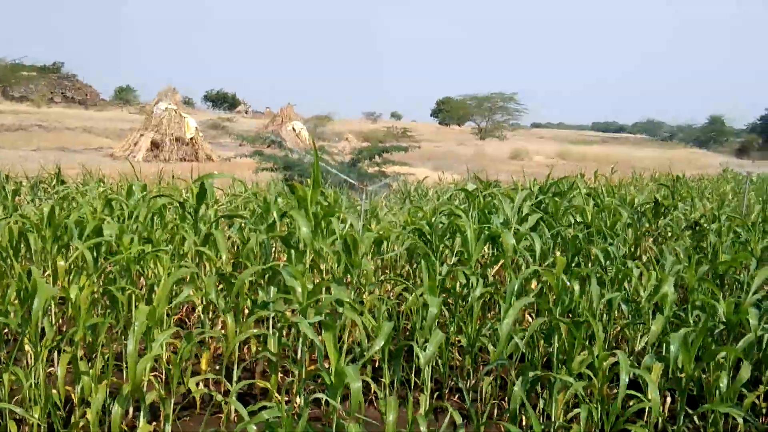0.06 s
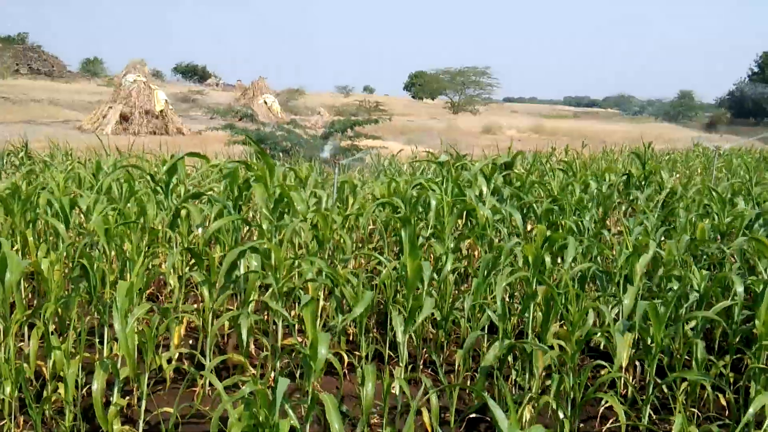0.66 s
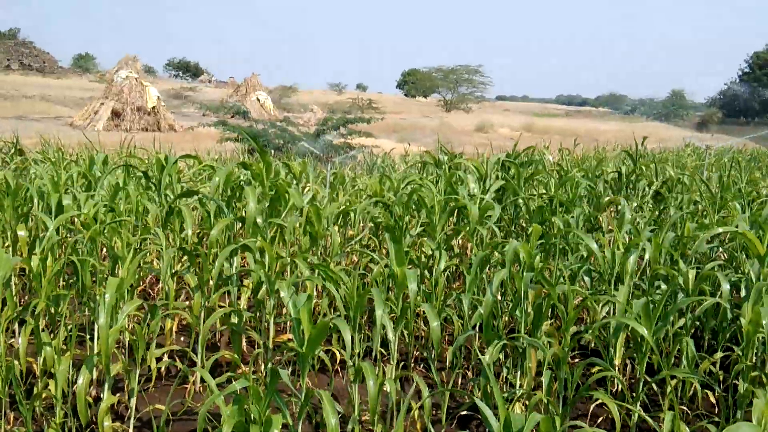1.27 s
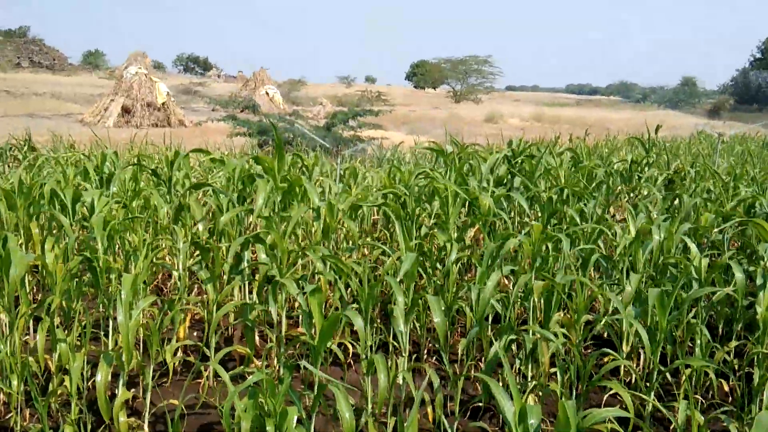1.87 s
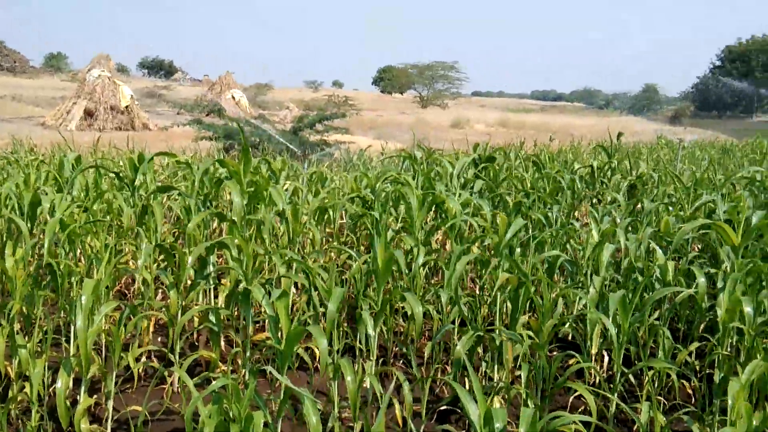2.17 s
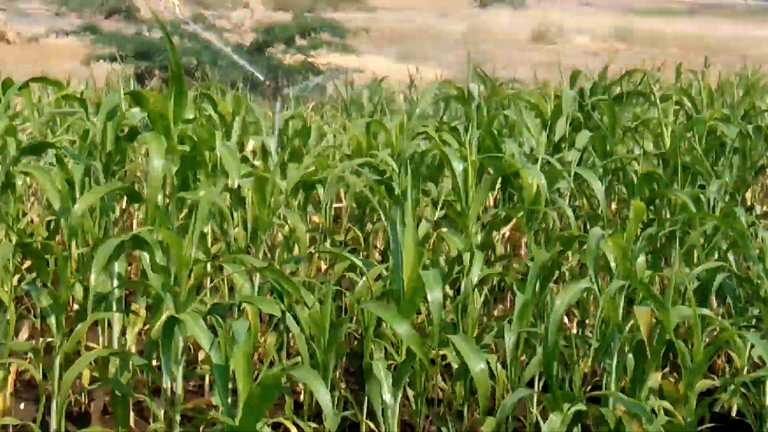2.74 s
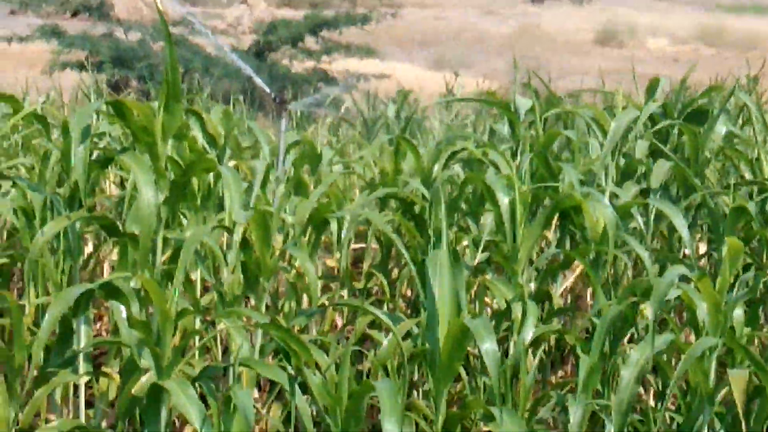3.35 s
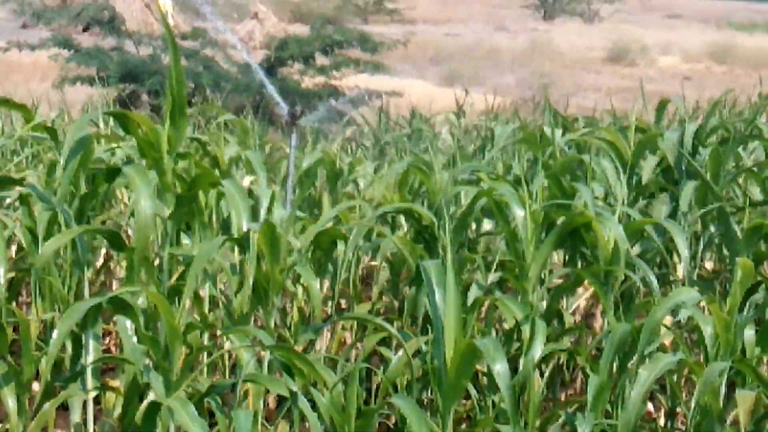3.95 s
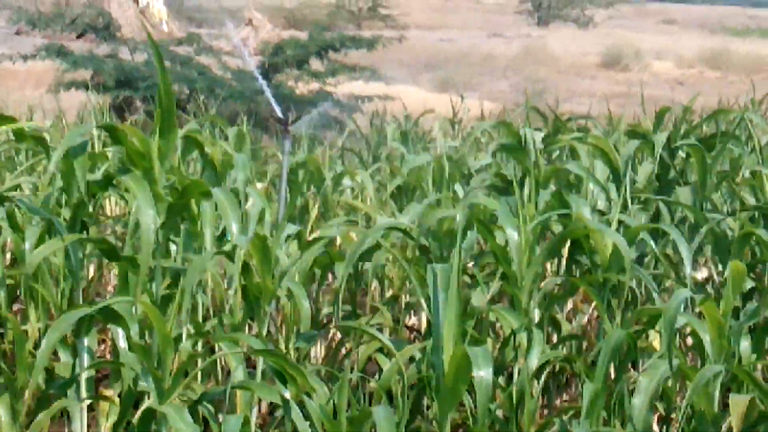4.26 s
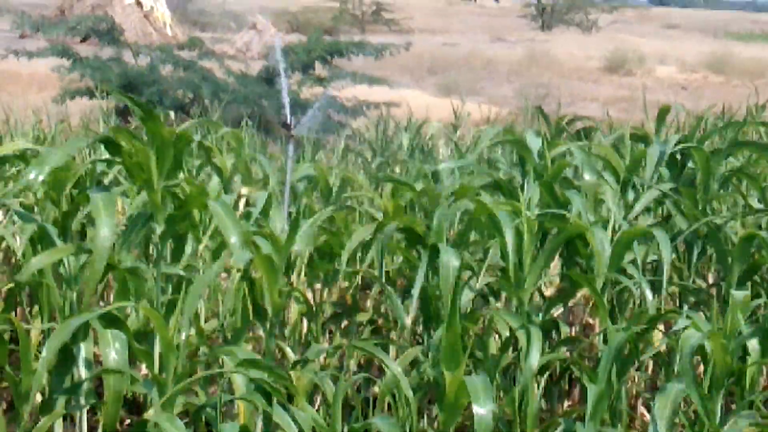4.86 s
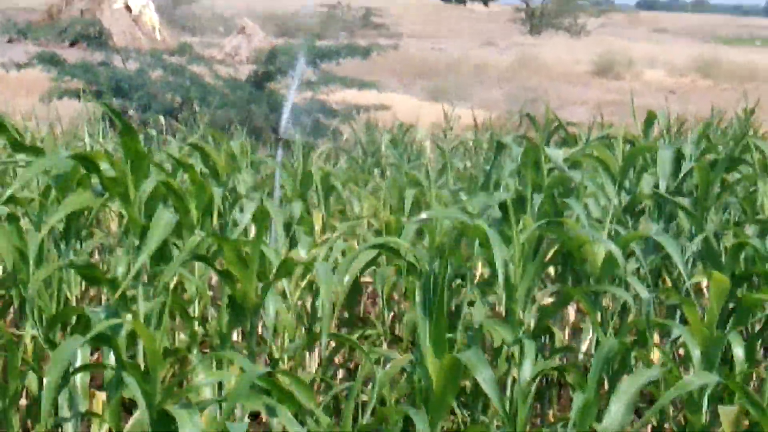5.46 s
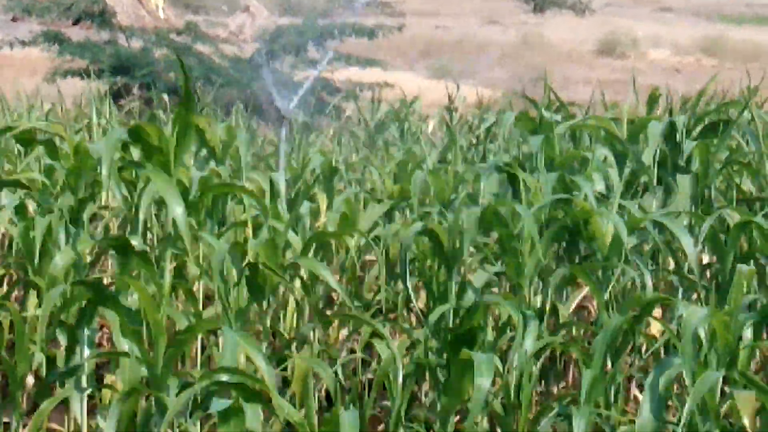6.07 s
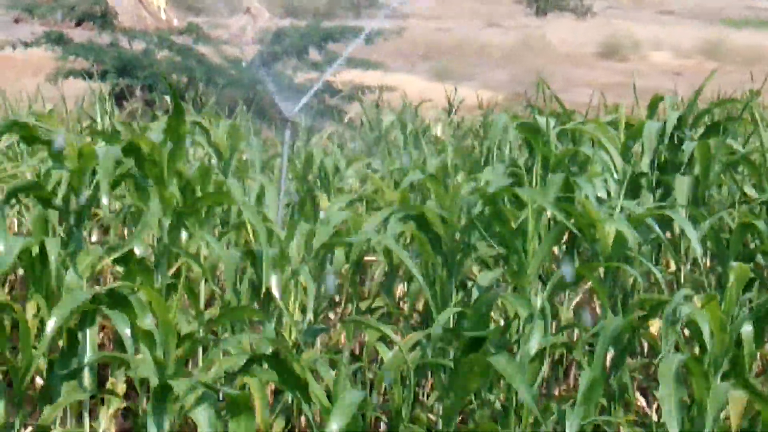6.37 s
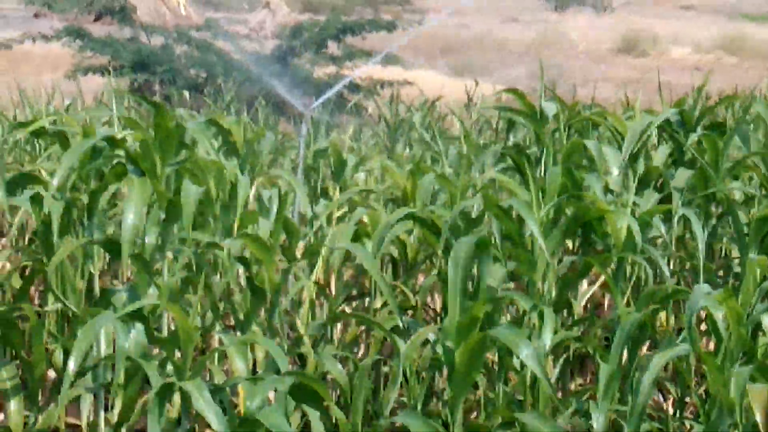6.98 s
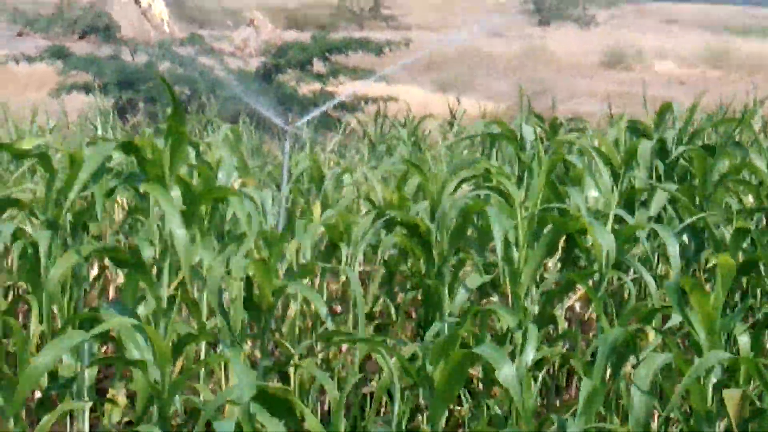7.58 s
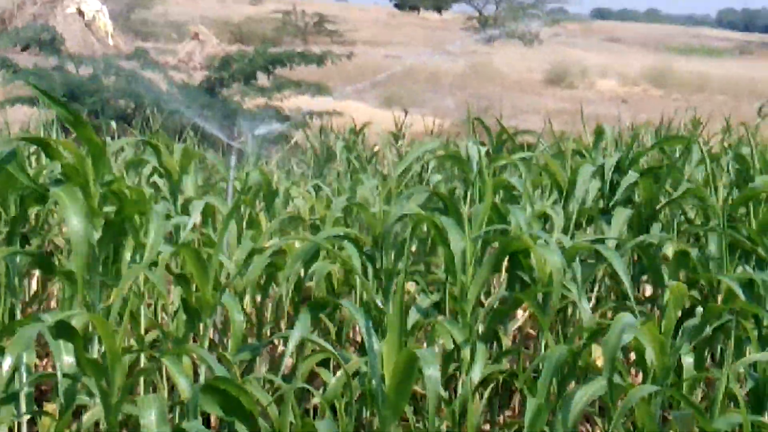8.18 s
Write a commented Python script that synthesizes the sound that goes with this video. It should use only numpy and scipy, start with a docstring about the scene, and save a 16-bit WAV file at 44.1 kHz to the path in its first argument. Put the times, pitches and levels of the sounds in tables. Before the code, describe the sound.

An impact sprinkler stands some way off in a field of tall crops, ticking and spitting spray about five times a second over a faint water hiss and soft leaf rustle. Gusty wind rumbles and thumps on the microphone, louder than the water. Just past the middle the wind drops and the whole sound dips briefly three times. Then the gusts return with their hardest thumps as the sprinkler carries on.

```python
"""Impact sprinkler in a breezy field

The sprinkler stands some way off in tall crop. Five times a second its arm slaps into the jet and
spits a fan of spray; between spits the jet hisses and drops patter on the rustling leaves. Close by,
blades scrape and a few small clicks sound. Puffs of wind carry vortices over the microphone, the
hardest as single thumps; in a lull the whole sound dips briefly three times."""
import sys
import numpy as np
from scipy import signal
from scipy.fft import rfft, irfft, next_fast_len
from scipy.io import wavfile
from scipy.ndimage import uniform_filter1d, minimum_filter1d

SR = 44100
rng = np.random.default_rng(int(sys.argv[2]) if len(sys.argv) > 2 else 0)


def to_wav(s):
    """Save 16-bit WAV."""
    ch = np.atleast_2d(s).T  # columns
    pcm = np.round(np.clip(ch, -1, 1) * 32767)  # PCM
    wavfile.write(sys.argv[1], SR, pcm.astype(np.int16))


N = 362943
TIME = np.arange(N) / SR
EDDY_HALF_S = 0.02


def undb(db):
    """Decibels to gain."""
    return 10 ** (np.asarray(db) / 20)


def unit(x):
    """Scale to rms 1."""
    return x / np.sqrt(np.mean(x ** 2))


def curve(table, column=1):
    """One column of a table, joined by straight lines in time."""
    rows = np.array(table)
    return np.interp(TIME, rows[:, 0], rows[:, column])


def add(out, start_s, sound):
    """Mix a sound in at a given time."""
    i = int(start_s * SR)
    part = sound[max(-i, 0):max(N - i, 0)]
    out[max(i, 0):max(i, 0) + len(part)] += part


def colour(x, spectrum):
    """Shape a signal by (frequency [Hz], gain [dB]) points; rms 1."""
    hz, db = np.transpose(spectrum)
    size = next_fast_len(N)
    bin_hz = np.maximum(np.fft.rfftfreq(size, 1 / SR), 1)
    gain = undb(np.interp(np.log(bin_hz), np.log(hz), db))
    return unit(irfft(rfft(x, size) * gain, size)[:N])


def walk(rate):
    """Random levels held 1 / rate s and smoothed twice; rms 1."""
    step = max(int(SR / rate), 2)
    held = np.repeat(rng.standard_normal(N // step + 1), step)
    return unit(uniform_filter1d(uniform_filter1d(held, step), step)[:N])


def impacts(rate, spread_db):
    """Random impulses, about `rate` a second; spread_db makes a few stand out; rms 1."""
    sizes = undb(spread_db * np.minimum(rng.exponential(size=N), 5))
    hits = rng.random(N) < rate / SR
    return unit(hits * sizes * rng.choice([-1, 1], N))


def flicker(x, rate, depth_db):
    """Let each half octave in the treble swell and fade on its own; rms 1."""
    size = next_fast_len(N)
    spectrum = rfft(x, size)
    bin_hz = np.maximum(np.fft.rfftfreq(size, 1 / SR), 1)
    half_octaves = np.clip(2 * np.log2(bin_hz / 3500), 0, 4)
    bands = (irfft(spectrum * np.maximum(1 - abs(half_octaves - k), 0), size)[:N] for k in range(5))
    return unit(sum(band * undb(depth_db * walk(rate)) for band in bands))


# level of the jet at the microphone; the background drops briefly just after the loudest wind thump: # (time
# [s], hiss level [dB], patter level [dB])
JET_LEVELS = [(0, -57.5, -79), (1.5, -64.5, -66.5), (2.6, -62.5, -76), (3.6, -61.5, -67),
              (5.05, -63, -70.5), (6.1, -60, -67), (6.7, -59, -66.5), (6.9, -63.5, -66), (7.4, -58, -67.5),
              (8.23, -59.5, -61)]
# tone of the jet: (frequency [Hz], gain [dB])
JET_SPECTRUM = [(1500, -18), (3200, -10), (4900, -4.5), (6100, -6.5), (7000, -5), (8800, 1), (10200, 6),
                (10900, -.5), (12400, -20), (16000, -31.5)]
# tone of a struck or scraped leaf: (frequency [Hz], gain [dB])
LEAF_SPECTRUM = [(2000, -29.5), (3800, -12.5), (5200, -3.5), (7000, 0), (10500, 1), (12700, -8.5),
                 (16000, -21)]


def jet():
    """Out in the crop the free jet hisses and its drops patter on the leaves."""
    flutter = undb(0.9 * walk(51))
    hiss = colour(rng.standard_normal(N) * flutter, JET_SPECTRUM)
    patter = colour(impacts(rate=300, spread_db=6.5), LEAF_SPECTRUM)
    hiss = flicker(hiss, rate=51, depth_db=1.4)
    return hiss * undb(curve(JET_LEVELS)) + patter * undb(curve(JET_LEVELS, column=2))


# level of the rustle; the background drops briefly just after the loudest wind thump: (time [s], level [dB])
RUSTLE_LEVELS = [(0, -55.5), (.3, -58.5), (3.6, -58), (4.4, -56.5), (4.95, -60), (5.17, -55), (5.6, -58.5),
                 (5.8, -54.5), (6.75, -54.5), (6.9, -58.5), (7.35, -54.5), (8.23, -55.5)]
# tone of the rustle: (frequency [Hz], gain [dB])
RUSTLE_SPECTRUM = [(60, -26), (300, -4), (600, 0), (1100, 2), (1600, 1), (2000, 3.5), (2250, 0),
                   (2550, 0.5), (2950, -4.5), (4500, -5.5), (9000, -15)]


def field_rustle(flutter_db=0.82):
    """Leaves rustle softly all over the field."""
    rustle = rng.standard_normal(N) + undb(-6) * impacts(rate=500, spread_db=5)
    return colour(rustle, RUSTLE_SPECTRUM) * undb(curve(RUSTLE_LEVELS) + flutter_db * walk(30))


# the breeze at the microphone, with a lull in the middle: (time [s], level [dB])
BREEZE_LEVELS = [(0, -27.5), (.24, -43.5), (.56, -40), (.8, -35), (1.35, -27), (1.7, -33), (2.3, -38.5),
                 (2.75, -37.5), (3.05, -28.5), (3.64, -39.5), (4.42, -46), (4.56, -67), (5.62, -54.5),
                 (5.76, -30.5), (6.05, -38.5), (6.75, -29), (7.3, -34.5), (8.23, -43)]
# puffs at the microphone: (middle time [s], length [s], level [dB], vortex centre [Hz])
WIND_PUFFS = [(0.103, 0.042, -25, 105), (0.182, 0.016, -22, 116), (0.334, 0.072, -32, 102),
              (0.789, 0.099, -30.5, 95), (0.95, 0.046, -32, 98), (1.06, 0.028, -30, 98),
              (1.2, 0.067, -24.5, 135), (1.338, 0.067, -15, 137), (1.59, 0.16, -36, 136),
              (1.878, 0.043, -20, 100), (1.985, 0.12, -26.5, 158), (2.288, 0.098, -23, 125),
              (2.41, 0.098, -27.5, 145), (2.58, 0.089, -25, 104), (2.761, .04, -32, 137),
              (2.963, 0.13, -23, 119), (3.25, 0.039, -25, 162), (3.373, .08, -28, 146),
              (3.501, 0.058, -27.5, 146), (3.73, 0.058, -30, 108), (3.839, 0.023, -28, 131),
              (3.93, 0.018, -17.5, 133), (4.049, 0.069, -27, 139), (4.177, 0.071, -28, 127),
              (4.299, 0.011, -27.5, 107), (4.436, 0.062, -31, 107), (4.989, 0.021, -38, 87),
              (5.137, 0.032, -38.5, 86), (5.207, 0.014, -35.5, 99), (5.314, 0.056, -43, 87),
              (5.703, 0.02, -21, 152), (5.826, 0.036, -23.5, 154), (5.896, 0.076, -28, 120),
              (6.118, 0.067, -27, 152), (6.269, 0.064, -26, 173), (6.376, 0.043, -20.5, 209),
              (6.457, 0.033, -23.5, 223), (6.583, 0.046, -20, 245), (6.647, 0.075, -21.5, 186),
              (6.773, 0.05, -20.5, 219), (6.819, 0.025, -11.5, 150), (6.941, 0.048, -19, 125),
              (7.035, 0.027, -23.5, 140), (7.133, 0.13, -23.5, 176), (7.346, .05, -29.5, 149),
              (7.625, 0.023, -22.5, 142), (7.777, 0.41, -35.5, 139), (7.888, 0.068, -28, 141),
              (8.139, .04, -27.5, 124), (8.22, 0.022, -29, 127)]


def airflow(turbulence_db=3.5, eddy_hz=114.1, reference_db=-28.5, doubling_db=51):
    """Strength of the wind and centre frequency of its vortices: a turbulent breeze plus puffs."""
    breeze_db = curve(BREEZE_LEVELS)
    power = undb(breeze_db + turbulence_db * walk(30)) ** 2
    # a faster breeze sheds quicker vortices
    weighted_hz = power * eddy_hz * 2 ** ((breeze_db - reference_db) / doubling_db)
    t = np.arange(-(SR // 4), SR // 4) / SR
    for middle, length, db, hz in WIND_PUFFS:
        puff = undb(db) ** 2 * np.exp(-2 * (2 * t / length) ** 2)
        add(power, middle + t[0], puff)
        add(weighted_hz, middle + t[0], puff * hz)
    return np.sqrt(power), weighted_hz / power


def eddy(hz, phase_turns):
    """Pressure swing of one vortex crossing the microphone port; small ones are quick and bright."""
    half = int(EDDY_HALF_S * SR)
    t = np.arange(-half, half) / SR
    swing = 1 / (1 - 2j * np.pi * hz * t / 2.5)
    return np.real(np.exp(2j * np.pi * phase_turns) * swing ** 3)


def microphone_port(x, cut_hz=62, ring_hz=115, width_hz=24, ring_db=-7):
    """The microphone passes no deep bass and booms a little at one low pitch."""
    x = signal.sosfilt(signal.butter(4, cut_hz, "high", fs=SR, output="sos"), x)
    boom = signal.lfilter(*signal.iirpeak(ring_hz, ring_hz / width_hz, fs=SR), x)
    return x + undb(ring_db) * boom


def wind_rumble(count=2000, pitch_scatter=0.23, spread_db=5, gain_db=0.21):
    """Vortices rumble right on the microphone, as strong and as quick as the air that carries them."""
    strength, centre_hz = airflow()
    stream = np.zeros(N)
    timings, shapes = rng.random((count, 2)), rng.standard_normal((count, 2))
    for k, ((slot, phase), (size, speed)) in enumerate(zip(timings, shapes)):
        i = int((k + slot) / count * (N - 1))
        hz = 0.97 * centre_hz[i] * np.exp(pitch_scatter * speed)
        add(stream, i / SR - EDDY_HALF_S, undb(spread_db * size) * eddy(hz, phase))
    # even out the stream so that the airflow alone sets its strength
    stream /= np.sqrt(uniform_filter1d(uniform_filter1d(stream ** 2, SR // 40), SR // 80))
    fade_in = np.minimum(TIME / EDDY_HALF_S, 1)
    return microphone_port(stream * strength * undb(gain_db) * fade_in)


# strokes of the arm, some way off: (time [s], length [s], spray level [dB], slap level [dB])
ARM_STROKES = [(0.035, 0.043, -48.5, -37), (0.239, 0.025, -48.5, -47), (0.43, .037, -47.5, -36),
               (0.626, .035, -48.5, -39.5), (0.819, 0.08, -50.5, -41), (0.999, 0.049, -49.5, -58),
               (1.205, 0.036, -49.5, -38), (1.399, .044, -48.5, -41), (1.592, .041, -47, -46),
               (1.781, 0.039, -46, -38.5), (1.976, 0.038, -46.5, -42), (2.172, 0.041, -49.5, -39),
               (2.361, 0.044, -49, -44), (2.545, 0.049, -45.5, -47), (2.754, 0.042, -45, -38),
               (2.95, 0.029, -44, -37), (3.143, 0.038, -46, -33), (3.339, 0.04, -48.5, -40),
               (3.532, .04, -49, -49), (3.732, 0.046, -47, -42), (3.937, .04, -47.5, -49.5),
               (4.118, 0.076, -50.5, -52), (4.329, 0.04, -47, -45), (4.527, 0.035, -50.5, -36),
               (4.73, 0.037, -52.5, -40), (4.946, 0.031, -52, -56), (5.134, 0.033, -48, -56),
               (5.335, .043, -51.5, -43), (5.543, 0.04, -48, -48), (5.741, .043, -48.5, -49),
               (5.948, 0.047, -49, -42), (6.159, 0.044, -51, -51), (6.365, 0.029, -47.5, -42),
               (6.555, 0.071, -49, -66), (6.77, 0.032, -47, -49), (6.972, 0.044, -48, -53),
               (7.148, 0.071, -50, -63), (7.367, .044, -47.5, -49.5), (7.576, 0.041, -43, -41),
               (7.777, 0.032, -45.5, -56), (7.98, 0.024, -47, -50), (8.171, 0.033, -43.5, -41)]
# tone of the spray: (frequency [Hz], gain [dB])
SPRAY_SPECTRUM = [(1000, -38.5), (2800, -21.5), (4300, -9), (5100, -5), (5450, -12), (6500, -6.5),
                  (8300, -6), (8800, -9), (9900, -0.5), (10900, 1), (11850, -7), (12700, -13), (14300, -15),
                  (16000, -21)]
# tone of the arm striking the jet: (frequency [Hz], gain [dB])
SLAP_SPECTRUM = [(1500, -7), (3000, -14.5), (4500, 3.5), (5500, -3), (8000, -7.5), (9000, -26),
                 (10800, 11.5), (12000, -7), (12700, -22), (16000, 0)]


def sprinkler(rise_s=0.0062, fall_s=0.0096, slap_s=0.0016, slap_lag_s=0.0028,
              trail_s=0.067, trail_lag_s=0.08):
    """The arm slaps into the jet, shreds it harder as it goes deeper, swings out; thin spray trails."""
    spray_power, slaps = np.zeros(N), np.zeros(N)
    t = np.arange(-(SR // 50), SR // 5) / SR
    for start, length, spray_db, slap_db in ARM_STROKES:
        in_jet = np.exp(np.minimum(t, 0) / rise_s - np.maximum(t - length, 0) / fall_s)
        swell_db = np.minimum(t / length, 1)
        fan = in_jet * undb(spray_db - 1.4 + swell_db)
        trail_db = spray_db - 13 + 2 * rng.standard_normal()
        trail = undb(trail_db) * np.exp(-0.5 * ((t - length - trail_lag_s) / trail_s) ** 2)
        add(spray_power, start + t[0], fan ** 2 + trail ** 2)
        add(slaps, start + t[0], undb(slap_db - 1) * np.exp(-abs(t - slap_lag_s) / slap_s))
    # the sheet of water tears into droplets, so the hiss sputters and no two spits have the same colour
    water = rng.standard_normal(N) + undb(2.5) * impacts(rate=2800, spread_db=0)
    water = flicker(colour(water, SPRAY_SPECTRUM), rate=80, depth_db=2.5)
    sputter = unit(undb(2.55 * walk(450)))
    spray = np.sqrt(spray_power) * water * sputter
    return spray + slaps * colour(rng.standard_normal(N), SLAP_SPECTRUM)


# the hardest vortices, right on the microphone: (time [s], level [dB], centre [Hz])
HARD_VORTICES = [(0.096, -24.5, 187), (1.341, -11, 322), (1.94, -15.5, 160), (1.982, -14.5, 296),
                 (2.022, -14, 242), (2.08, -13.5, 231), (2.273, -18, 161), (3.243, -23, 267),
                 (3.335, -17.5, 210), (3.514, -20, 250), (3.927, -29, 200), (4.222, -18, 175),
                 (5.699, -12, 248), (6.206, -10, 346), (6.259, -11, 338), (6.375, -9.5, 312),
                 (6.44, -25, 477), (6.459, -16.5, 260), (6.495, -16, 308), (6.561, -13, 276),
                 (6.577, -7.5, 310), (6.587, -8, 282), (6.64, -10.5, 300), (6.653, -8, 225),
                 (6.71, -10.5, 312), (6.772, -4, 233), (6.821, -5.5, 302), (6.858, -14, 228),
                 (6.952, -17, 370), (7.106, -13, 230), (7.144, -17, 300), (7.425, -17.5, 274),
                 (7.512, -8, 218)]


def wind_buffets(wake_db=-13, wake_lag_s=0.00491, wake_spread_s=0.0087):
    """Single hard vortices thump on the port, each breaking into four weaker ones around and after it."""
    out = np.zeros(N)
    for time, db, hz in HARD_VORTICES:
        start = time - EDDY_HALF_S
        add(out, start, undb(db + 1) * eddy(hz, rng.random()))
        for lag, speed in rng.standard_normal((4, 2)):
            wake = eddy(0.82 * hz * np.exp(0.31 * speed), rng.random())
            add(out, start + wake_lag_s + wake_spread_s * lag, undb(db + wake_db) * wake)
    return microphone_port(out)


# leaves near the microphone, scraping in the gusts: (time [s], length [s], level [dB])
LEAF_STROKES = [(0.108, .08, -55), (1.097, 0.063, -54.5), (1.33, 0.066, -54), (1.822, 0.051, -52),
                (2.061, 0.015, -47.5), (2.078, 0.033, -52), (2.297, 0.062, -50), (6.671, 0.039, -50.5)]


def leaf_scrapes():
    """Rough blades close by catch and slip on each other in short crackling strokes."""
    strokes = np.zeros(N)
    for start, length, db in LEAF_STROKES:
        add(strokes, start, undb(db) * signal.windows.tukey(int(length * SR)))
    slips = impacts(rate=9300, spread_db=5) * undb(1.5 * walk(330))
    return strokes * colour(slips, LEAF_SPECTRUM)


# small clicks close to the microphone: (time [s], level [dB], band frequency [Hz], decay [s])
CLOSE_CLICKS = [(0.436, -48, 7500, 0.0034), (2.466, -49.5, 1700, 0.01), (6.623, -39, 3000, 0.00084),
                (6.631, -27, 1420, 0.0014), (6.68, -41, 8200, 0.0021), (6.713, -45, 4500, .0022),
                (7.836, -36, 1510, 0.0018)]


def clicks():
    """Dry little ticks at close range, each a broad and quickly dying resonance."""
    out, t = np.zeros(N), np.arange(SR // 16) / SR
    for start, db, hz, decay in CLOSE_CLICKS:
        band = signal.butter(1, [hz * 0.55, hz * 1.25], "band", fs=SR, output="sos")
        noise = unit(signal.sosfilt(band, rng.standard_normal(len(t))))
        add(out, start, undb(db) * noise * np.exp(-t / decay))
    return out


# brief dips of the whole sound in the lull: (time [s], length [s], depth [dB])
LULL_DIPS = [(4.575, 0.15, -17.5), (4.764, 0.16, -15.5), (5.384, 0.14, -17)]


def dips(fall_s=0.032, recover_s=0.014):
    """Gain that sinks smoothly in each dip and comes back quickly."""
    db = np.zeros(N)
    for start, length, depth_db in LULL_DIPS:
        sunk = 1 - np.exp(-np.maximum(TIME - start, 0) / fall_s)
        release = np.exp(-np.maximum(TIME - start - length, 0) / recover_s)
        db += depth_db * sunk * release
    return undb(db)


def scene():
    """One microphone in the field: water, leaves and wind, all dipping together in the lull."""
    mix = sprinkler() + jet() + field_rustle() + leaf_scrapes() + clicks()
    mix += wind_rumble() + wind_buffets()
    return (mix * dips())[None]


def record(dry, ceiling=0.86, hold_s=0.05, top_hz=15700):
    """A limiter ducks everything briefly at any peak over the ceiling, and the recorder cuts the top."""
    hold, ramp = int(hold_s * SR), SR // 250
    needed_gain = ceiling / np.maximum(abs(dry), ceiling)
    held_gain = minimum_filter1d(needed_gain, hold, axis=-1, origin=hold // 2 - ramp)
    limited = dry * uniform_filter1d(held_gain, ramp, axis=-1)
    return signal.sosfilt(signal.ellip(10, 0.2, 80, top_hz, fs=SR, output="sos"), limited)


dry = scene()
out = record(dry)
to_wav(out)
```